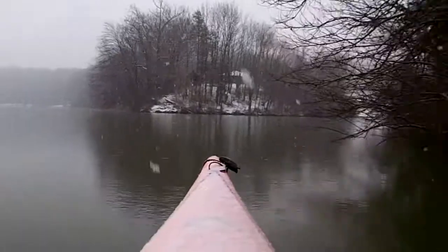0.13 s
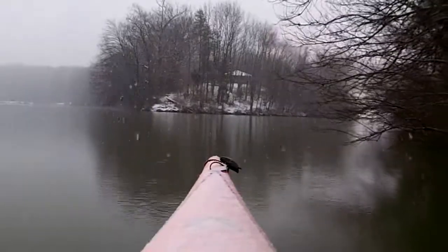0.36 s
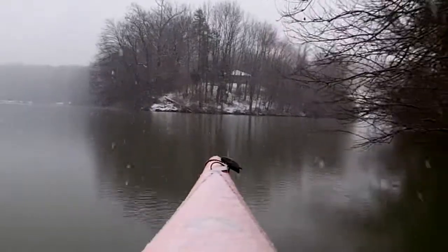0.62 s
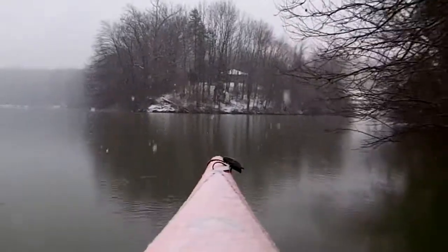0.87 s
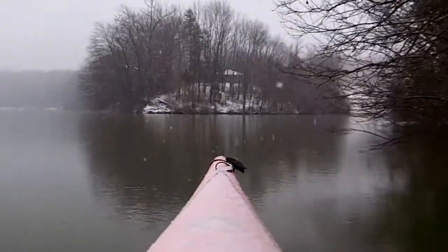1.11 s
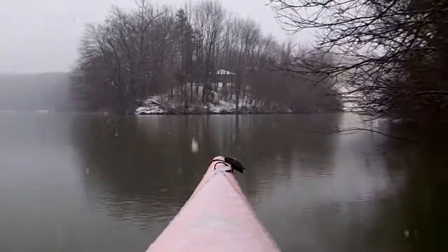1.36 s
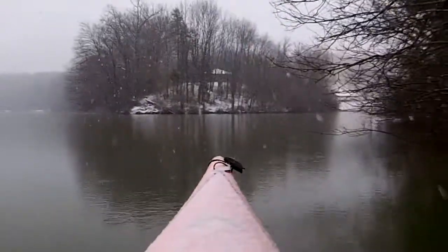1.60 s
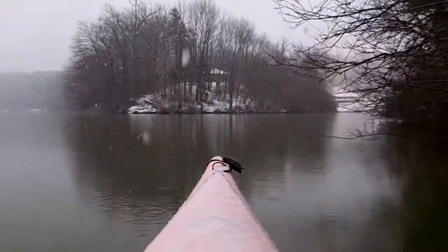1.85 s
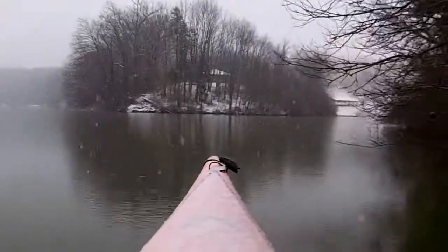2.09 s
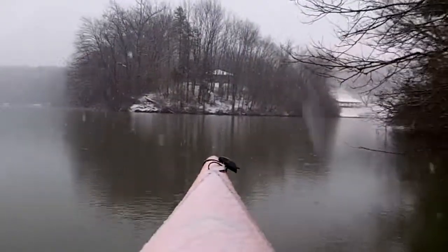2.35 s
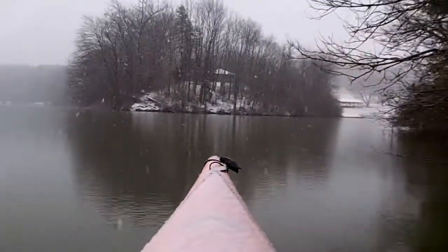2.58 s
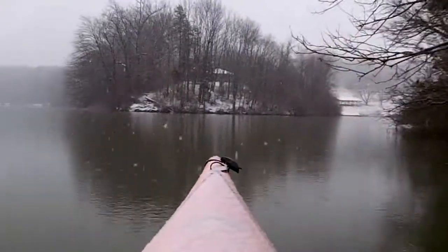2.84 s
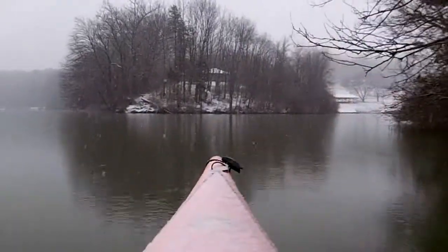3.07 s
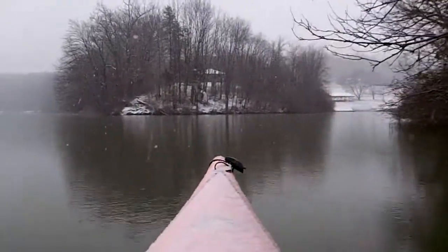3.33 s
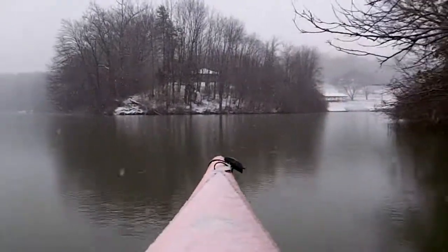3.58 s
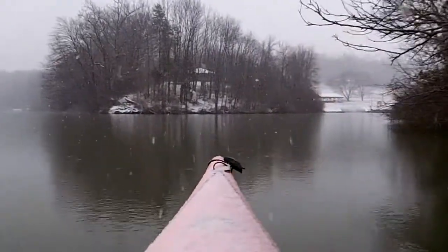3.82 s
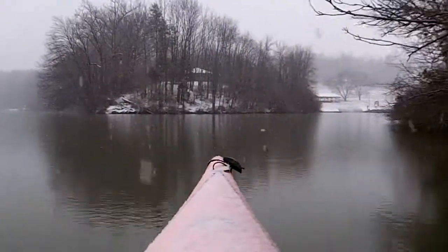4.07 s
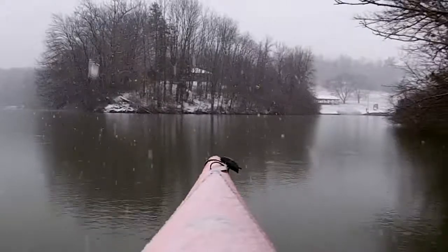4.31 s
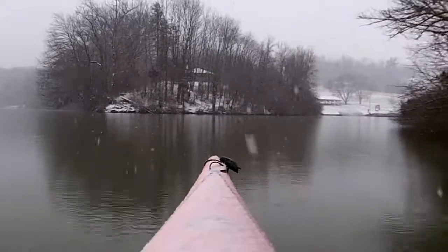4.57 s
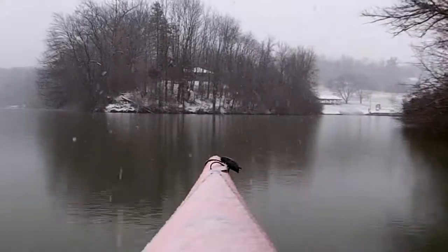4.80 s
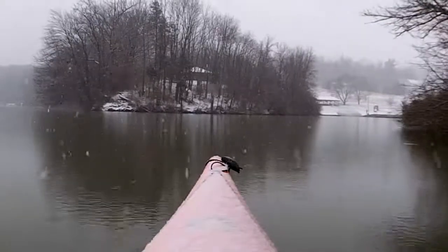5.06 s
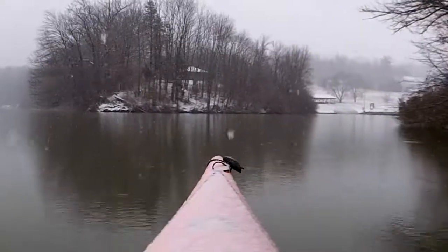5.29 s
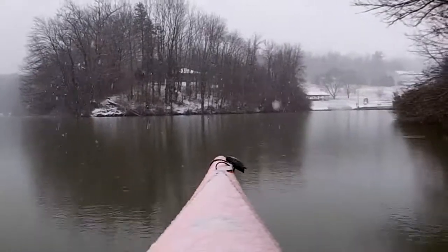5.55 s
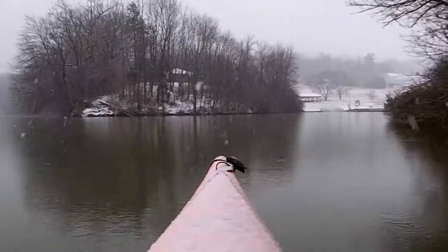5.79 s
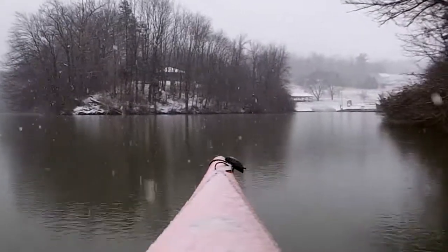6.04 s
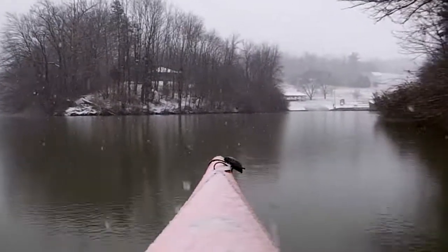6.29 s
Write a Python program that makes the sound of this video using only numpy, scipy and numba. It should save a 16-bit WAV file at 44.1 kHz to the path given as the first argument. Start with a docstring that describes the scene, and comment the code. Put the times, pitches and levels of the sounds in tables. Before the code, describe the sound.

Calm lake in snowfall: scattered round bubbly plops close by, faint dry ticks, one loud click near the start, steady soft roar and hiss.

```python
"""On a calm lake in falling snow, from a drifting kayak: mono, a small camera in the cockpit.
Close by, drips plink along the hull as gliding bubble tones over a trickle of tiny ones; pellets of snow
tick on the casing as noise bursts. One strikes the microphone port: a pressure pulse, and the gain ducks.
Far off, wind and water roar as coloured noise; nearest of all lie the microphone's hiss and faint tones."""
import sys
import numpy as np
from scipy import signal
from scipy.fft import rfft, irfft, next_fast_len
from scipy.io import wavfile
from scipy.ndimage import uniform_filter1d
from numba import njit

SR = 44100
rng = np.random.default_rng(int(sys.argv[2]) if len(sys.argv) > 2 else 0)


def makeup_ratio(level_db):
    """Linear amplitude ratio for a level in decibels (20 dB per factor of ten)."""
    decades = np.asarray(level_db, float) / 20
    return 10 ** decades


def log_audio(samples):
    """Write samples as a 16-bit WAV file to the path given in sys.argv[1]."""
    # one column per channel
    frames = np.atleast_2d(samples).T
    # limit to full scale, then quantise
    limited = np.clip(frames, -1, 1)
    pcm = np.round(limited * 32767).astype(np.int16)
    wavfile.write(sys.argv[1], SR, pcm)


N = 282681  # samples

# Drips that ring as bubbles: [t/s, level/dB, f/Hz, glide/share of the cycles gained by the end]
DRIPS = [(0.321, -29.5, 2560, .05), (0.511, -22.5, 934, -0.041), (.908, -36, 3300, -.1),
         (0.938, -19, 1435, -0.31), (.945, -33.5, 3050, .05), (1.507, -25.5, 1120, 0.084),
         (1.508, -25.5, 1700, 0.11), (1.579, -32.5, 2460, .1), (1.739, -48, 4050, .05),
         (1.7677, -24.5, 1855, -0.13), (1.7676, -43, 3580, 0.12), (1.9313, -25, 2440, 0.033),
         (1.932, -22, 1790, 0.065), (1.935, -43, 3850, -.3), (1.9507, -19, 1600, 0.26),
         (2.005, -43, 3450, 0), (2.552, -20.5, 1525, 0.22), (2.6842, -21.5, 983, 0.0087),
         (2.683, -19.5, 1690, 0.55), (2.752, -30, 1980, 0.62), (3.02, -38, 3420, 1.1),
         (3.198, -43, 3300, -0.6), (3.204, -22, 2450, -0.09), (3.2046, -28, 1970, -.15),
         (3.2055, -18.5, 1590, 0.1), (3.207, -26, 1045, 0.44), (3.801, -22.5, 1685, 0.59),
         (3.892, -40, 3260, -0.077), (4.664, -36, 1970, .3), (4.75, -24.5, 1900, 0.2),
         (4.759, -21, 1380, 0.71), (4.792, -26, 1640, 0.089), (4.812, -25.5, 1590, .5),
         (4.864, -30, 2300, -0.093), (4.944, -30.5, 2130, 0.2), (5.013, -28, 1690, 0.93),
         (5.056, -27.5, 1840, 0.86), (5.0804, -32, 2100, .3), (5.132, -26, 1280, -0.045),
         (5.134, -24, 1870, 0.39), (5.1363, -34, 2900, -.1), (5.165, -22.5, 1250, .05),
         (5.1645, -28.5, 1980, .3), (5.411, -49, 3950, .05), (5.428, -39, 3260, -0.4),
         (5.45, -16.5, 1640, 0.076), (5.462, -43, 3100, -0.062), (6.028, -42, 3470, -0.0081),
         (6.166, -38, 2600, 0.79), (6.2708, -44, 3500, -.3)]
# Snow pellets on the casing: [t/s, level/dB, lower ring against upper/dB, length/ms]
PELLETS = [(0.0242, -30.5, -5.5, 1.6), (0.045, -27, -5.5, 1.1), (0.694, -42.5, -3, 1.5),
           (0.7877, -34, -1, 1.2), (0.9312, -55, 12.5, 1.5), (1.4633, -47, -1, 1.5),
           (1.5288, -30.5, -11, 1.2), (1.5788, -54, 8, 1.5), (1.943, -39, -5, 1.5), (2.5405, -35, -16, 1.7),
           (3.2535, -35, -1.5, 2.7), (3.3228, -32, 2.5, 1.3), (3.5124, -38, -3, 4.4),
           (3.522, -38, 4.5, 7.5), (3.531, -45, -3, 9.1), (3.906, -47, 7.5, 1.45), (4.3046, -39.5, -3, 1.7),
           (4.385, -35.5, -4, 1.5), (4.648, -35.5, -18, 1.3), (4.8533, -36.5, 3, 1.4),
           (4.8884, -39, -12, 1.2), (5.025, -43, -11, 3.4), (5.221, -54, 7.5, 1.5), (5.6372, -47, -10, 1.5),
           (6.0628, -43, -3, 1.5), (6.131, -54, 13, 1.4)]
# Resonances of the microphone port: [f/kHz, size/full scale, decay/ms]
PORT_RINGS = [(1.55, .18, 1.3), (4.0, .1, .45), (9.6, .035, .4), (14.5, .015, .6)]
# Spectrum of the far wind and water: [f/Hz, level/dB]
ROAR_COLOUR = [(15, -36), (25, -5.5), (60, -5), (114, -2), (177, -3.5), (225, -2), (400, -6), (800, -2.5),
               (1100, -5.5), (1700, -9.5), (2200, -14), (2700, -23), (3200, -28.5), (3900, -36.5),
               (5000, -45), (7000, -53.5)]
# Spectrum of the microphone's own hiss: [f/Hz, level/dB]
HISS_COLOUR = [(2000, -44), (4500, 0.5), (6300, -1.5), (9500, -6), (12000, 2), (15000, 3.5)]
# Response shared by all but the tones and the thump, dipping near 8 kHz: [f/Hz, level/dB]
SHARED_RESPONSE = [(6700, -2.5), (7300, -9), (7900, -19), (8500, -7.5), (9100, 0.5), (14800, -9.5),
                   (15000, -3), (15150, -36), (16500, -45)]
# Faint steady narrow bands: [f/Hz, width/Hz, level/dB]
NARROW_BANDS = [(120.9, 10.6, -50), (6140, 55, -83)]

STRIKE_S = .28178  # a pellet strikes the port


def colour(x, points):
    """Shape the spectrum through (f/Hz, level/dB) points joined on a log frequency axis."""
    hz, db = np.transpose(points)
    size = next_fast_len(len(x))
    f = np.maximum(np.arange(size // 2 + 1) * SR / size, 1)
    gain = makeup_ratio(np.interp(np.log(f), np.log(hz), db))
    return irfft(rfft(x, size) * gain, size)[:len(x)]


def level(x, db):
    """Set the rms level."""
    return x * makeup_ratio(db) / np.sqrt(np.mean(x ** 2))


def band(x, lo_hz, hi_hz):
    """Band-pass between two frequencies."""
    return signal.sosfilt(signal.butter(2, [lo_hz, hi_hz], "band", fs=SR, output="sos"), x)


def walk(rate_hz):
    """Random values drawn at a steady rate and joined by ramps; spread near 1."""
    hold = int(SR / rate_hz)
    steps = np.repeat(rng.standard_normal(N // hold + 1), hold)
    return uniform_filter1d(steps, hold)[:N]


def add(out, s, sound):
    """Mix a sound in at s seconds."""
    i = int(s * SR)
    out[i:i + len(sound)] += sound[:N - i]


def bubble(db, hz, glide, noise):
    """A bubble rings up in a cycle or two, glides in pitch and dies away; splash noise roughens it."""
    ring_cycles = 56  # until it has lost 60 dB
    t = np.arange(int(ring_cycles / hz * SR)) / SR
    u = t / t[-1]
    shape = (1 - np.exp(-t * hz / .9)) * np.exp(-np.log(1000) * u)
    tone = np.sin(2 * np.pi * hz * t * (1 + glide * u))
    splash = band(band(noise[:len(t)], 0.84 * hz, 1.42 * hz), 0.68 * hz, 1.23 * hz)
    return makeup_ratio(db) * shape / shape.max() * (tone + 1.3 * splash)


def drips():
    """Each drip along the hull rings a bubble and throws two smaller ones, pitched towards a limit."""
    spread_s, limit_hz, spray_db, spray_db_per_octave = .006, 3600, -8, -15
    out = np.zeros(N)
    noises = rng.standard_normal((len(DRIPS), SR // 5))
    sprays = rng.random((len(DRIPS), 2, 3))
    for (s, db, hz, glide), noise, spray in zip(DRIPS, noises, sprays):
        add(out, s, bubble(db, hz, glide, noise))
        for late, up, slide in spray:
            octaves = np.log2(limit_hz / hz) * up
            small_db = db + spray_db + spray_db_per_octave * octaves
            small = bubble(small_db, hz * 2 ** octaves, slide / 2, noise[::-1])
            add(out, s + spread_s * late, small)
    return out


def trickle():
    """Dense bubbles of a few cycles along the waterline, higher ones fainter; each drip stirs up more."""
    calm_db, stir_db, stir_s = -49, -29, .09  # stir_db is relative to the drip
    out = np.zeros(N)
    t = np.arange(SR // 50) / SR
    for s, size, pitch in rng.random((1500, 3)):
        cycles = t * 1100 * 2.7 ** pitch  # 1100 to 2970 Hz at the onset
        grain = cycles * np.exp(-cycles / 2.15) * np.sin(2 * np.pi * cycles * (1 + 0.0321 * cycles))
        add(out, s * N / SR, grain * makeup_ratio(-2.0 * np.log(size + .03) - 17 * pitch))
    clock = np.arange(N) / SR
    stir = np.zeros(N)
    for s, db, _, _ in DRIPS:
        stir += makeup_ratio(db + stir_db) * np.exp(-np.abs(clock - s) / stir_s) * (clock > s)
    return level(out, 0) * (makeup_ratio(calm_db) + stir)


def thump():
    """Air squeezed at the port builds up, lets go at once, rings in the port and sags back slowly."""
    ms = (np.arange(N) / SR - STRIKE_S) * 1000
    before, after = np.clip(-ms, 0, 50), np.clip(ms - .22, 0, 50)
    build = 0.79 * np.exp(-before / 0.3) + 0.31 * np.exp(-before / 0.7)
    release = 1 + np.exp(np.clip((ms - .2) / 0.057, -50, 50))
    push = -build / release * (ms > -50)
    ring = np.zeros(N)
    for khz, size, decay_ms in PORT_RINGS:
        ring += size * np.exp(-after / decay_ms) * np.sin(2 * np.pi * khz * after)
    sag = .4 * (1 - np.exp(-after / 1.2)) * np.exp(-(after / 5.4) ** 5.0)
    return push + ring + sag


def ticks():
    """Each pellet is a short crackle with a faint tail, split between two rings of the casing."""
    faint = [(s * N / SR, -60 - 2.0 * np.log(a + 1e-2), 4 - 8 * b, 1.5) for s, a, b in rng.random((40, 3))]
    # the pellet that strikes the port breaks up into four crumbs
    after_s, gap_s = 0.0029, 0.002
    crumbs = [(STRIKE_S + after_s + k * gap_s, -29, -12, .55) for k in range(4)]
    low, high = np.zeros(N), np.zeros(N)
    t_ms = np.arange(SR // 30) * 1000 / SR
    for s, db, low_db, length_ms in PELLETS + crumbs + faint:
        fade = np.exp(-(t_ms / length_ms) ** 3) + 0.3 * np.exp(-t_ms / 2.0)
        burst = makeup_ratio(db) * np.minimum(t_ms / 0.32, 1) * fade
        add(low, s, burst * makeup_ratio(low_db))
        add(high, s, burst)
    a, b = rng.standard_normal((2, N))
    low_ring = level(band(a, 5000., 7000.), 0) + level(band(a, 2800., 5000.), -5.5)
    high_ring = level(band(b, 8400., 15000.), 0)
    return low * low_ring + high * high_ring


def roar():
    """Far wind and water: steady rumble; as the boat drifts the middle swells, the flickering top dulls."""
    rumble_db, middle_db, top_db = -34, -36.5, -34  # gains
    swell_db_per_s, dull_db_per_s = 0.366, 0.28
    clock = np.arange(N) / SR
    x = level(colour(rng.standard_normal(N), ROAR_COLOUR), 3.87)
    rumble = signal.sosfiltfilt(signal.butter(2, 330., fs=SR, output="sos"), x)
    low = signal.sosfiltfilt(signal.butter(2, 1300., fs=SR, output="sos"), x)
    middle = (low - rumble) * makeup_ratio(middle_db + swell_db_per_s * clock)
    top = (x - low) * makeup_ratio(top_db - dull_db_per_s * clock + 1.1 * walk(14))
    return rumble * makeup_ratio(rumble_db) + middle + top


def hiss():
    """The microphone's own coloured noise, wavering slightly in level."""
    return level(colour(rng.standard_normal(N), HISS_COLOUR), -53.5) * makeup_ratio(1.1 * walk(23))


def tones():
    """Two narrow bands of noise and a thin steady whine of the electronics."""
    out = level(np.sin(2 * np.pi * 7650 * np.arange(N) / SR), -92)
    for hz, width, db in NARROW_BANDS:
        out += level(band(rng.standard_normal(N), hz - width / 2, hz + width / 2), db)
    return out


def scene():
    """All that the microphone gives, its hiss included; the ticks reach above the top of the hiss."""
    click = ticks()
    shaped = colour(drips() + trickle() + click + roar() + hiss(), SHARED_RESPONSE)
    sharp = makeup_ratio(-13) * band(click, 12700.0, 17000.0)
    return (shaped + sharp + thump() + tones())[None]


@njit
def follow(x, top, fall, slew):
    """Gain that brings peaks towards top, eases in and lets its peak hold fall at a steady dB rate."""
    gain, peak, g = np.empty(len(x)), top, 1.
    for i in range(len(x)):
        peak = max(abs(x[i]), peak * fall, top)
        g += slew * (top / peak - g)
        gain[i] = g
    return gain


def low_pass(x):
    """Removes everything above the highest recorded frequency."""
    return signal.sosfilt(signal.butter(12, 16510, fs=SR, output="sos"), x)


def record(dry):
    """Gain control ducks after peaks above -9.5 dB and recovers; the converter clips."""
    fall_db_per_s, ease_s = 100., 0.0032
    gain = follow(dry[0], makeup_ratio(-9.5), makeup_ratio(-fall_db_per_s / SR), 1 / (ease_s * SR))
    clipped = np.clip(dry * gain, -.96, .96)
    return low_pass(clipped)


dry = scene()
out = record(dry)
log_audio(out)
```